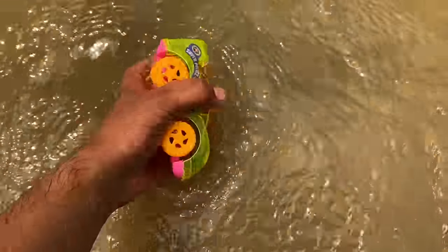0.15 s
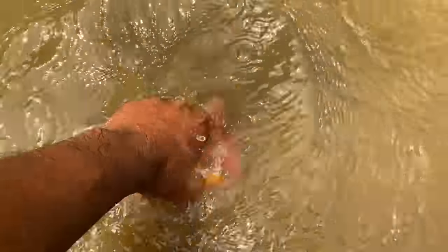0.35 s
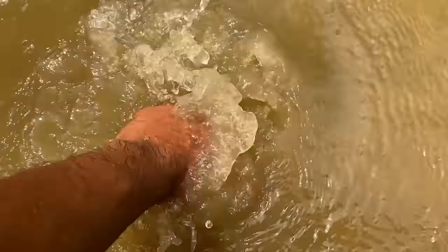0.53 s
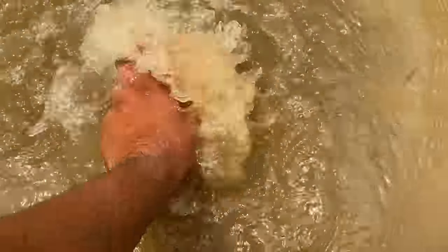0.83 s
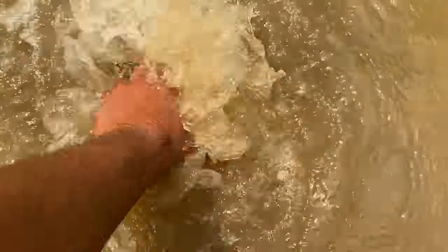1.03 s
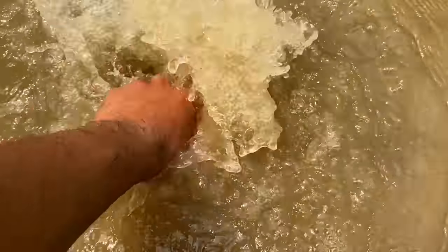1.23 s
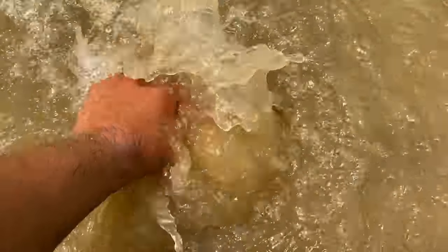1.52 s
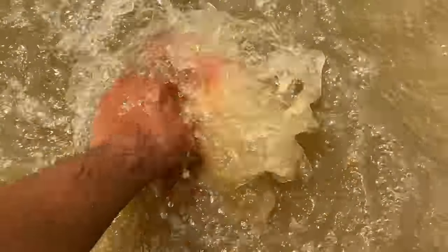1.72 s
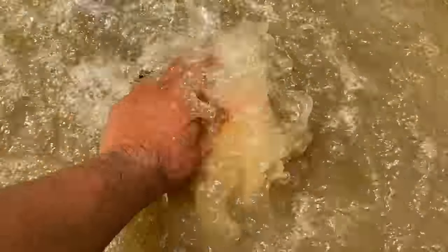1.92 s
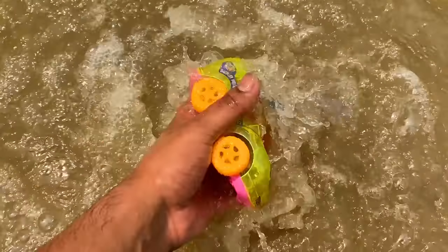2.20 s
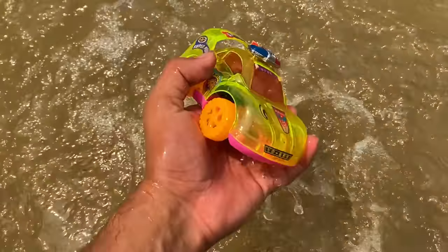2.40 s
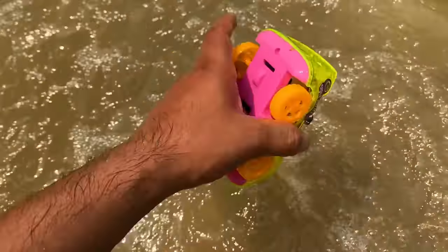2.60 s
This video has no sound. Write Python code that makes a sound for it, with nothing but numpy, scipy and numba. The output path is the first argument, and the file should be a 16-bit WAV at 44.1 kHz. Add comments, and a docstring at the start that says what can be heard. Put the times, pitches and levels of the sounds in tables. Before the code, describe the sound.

Vigorous bubbly water splashes, gurgling and slapping, as a toy is swished under shallow water

```python
"""Bubbles ring and glide as a hand swishes a hollow plastic toy back and forth under shallow water, outdoors.
Each stroke traps air: bubbles and air pockets, small to large, are fading sine waves, most rising in pitch.
Water slaps the toy in short noise bursts, spray crackles in tiny ringing drops and hisses as shaped noise.
A low rumble of lumpy noise swells underneath. A close microphone with two ports hears it all."""
import sys
import numpy as np
from scipy import signal
from scipy.fft import rfft, irfft
from scipy.io import wavfile
from numba import njit

SR = 44100
rng = np.random.default_rng(int(sys.argv[2]) if len(sys.argv) > 2 else 0)


def voltage_ratio(level):
    """Linear amplitude factor for a level in decibels (scalar or array-like)."""
    return 10 ** (np.asarray(level, float) / 20)


def transcribe(u):
    """Save the signal u as a 16-bit wav file named by the first command-line argument.

    u: samples, shape (n,) or (channels, n), limited to [-1, 1]; the rate is SR.
    q: integer samples, one column per channel.
    """
    v = np.clip(np.atleast_2d(u).T, -1, 1)
    q = np.round(v * 32767).astype(np.int16)
    wavfile.write(sys.argv[1], SR, q)


N = 121275  # samples, 2.75 s


def in_time(rows):
    """Draws straight lines between the rows of a table, giving one curve per column after the time."""
    time_s, *columns = np.transpose(rows)
    return [np.interp(np.arange(N) / SR, time_s, column) for column in columns]


def at_hz(points, hz):
    """Reads a table of pitch and level, with straight lines on a logarithmic pitch axis."""
    point_hz, point_db = np.transpose(points)
    return np.interp(np.log(hz + 1), np.log(point_hz), point_db)


def unit(x):
    """Scales a signal to an average (rms) strength of 1."""
    return x / np.sqrt(np.mean(x ** 2) + 1e-20)


def colour(x, tone):
    """Makes each pitch of a sound stronger or weaker, as a tone table says."""
    gain = voltage_ratio(at_hz(tone, np.fft.rfftfreq(N, 1 / SR)))
    return irfft(rfft(x) * gain, N)


def drift(rate_hz):
    """Smooths noise with two equal low-pass stages into a random wander of rms 1."""
    pole = np.exp(-2 * np.pi * rate_hz / SR)
    noise = rng.standard_normal(N + SR)
    smooth = signal.lfilter([1], [1, -2 * pole, pole * pole], noise)
    return unit(smooth[SR:])  # the first second lets the filter settle


@njit
def add_rings(out, start, height, hz, cycles, rise, onset_cycles, sr):
    """Adds sine waves that swell, fade by 40 dB over their cycles and glide to hz * (1 + 2 * rise)."""
    for k in range(len(start)):
        span = cycles[k] / hz[k] * sr  # samples
        for i in range(min(int(span), len(out) - start[k])):
            turns = i * hz[k] / sr
            swell = 1 - np.exp(-turns / onset_cycles)
            fade = np.exp(-4.6 * i / span)
            wave = np.sin(2 * np.pi * turns * (1 + rise[k] * i / span))
            out[start[k] + i] += height[k] * swell * fade * wave


def bubbles(level_db, sizes, rule, clumps):
    """Random bubbles come in clumps and more often in busy water; each rings and rises in pitch."""
    per_s, cycles, rise, spread_db, clump_db, lift_db = rule
    draw = rng.random((30000, 6))  # candidates, of which only some are born
    busy_db = 0.6 * (level_db - level_db.mean())
    start = (draw[:, 0] * N).astype(np.int64)
    crowding = voltage_ratio(clump_db * clumps + busy_db)
    born = draw[:, 1] < per_s * N / SR / len(draw) * crowding[start]
    lowest_hz, highest_hz = sizes[0][0], sizes[-1][0]
    hz = lowest_hz * (highest_hz / lowest_hz) ** draw[:, 2]
    height = voltage_ratio(at_hz(sizes, hz) - spread_db * np.log(draw[:, 3] + 0.09))
    ring_cycles = cycles * (0.68 + 2.35 * draw[:, 4])
    ring_rise = rise * 2 * draw[:, 5]
    out = np.zeros(N)
    add_rings(out, start[born], height[born], hz[born], ring_cycles[born], ring_rise[born], 0.57, SR)
    # Undo the loudness gained from sheer numbers, then follow the level curve.
    even = unit(out * voltage_ratio(-busy_db / 2))
    return voltage_ratio(level_db + lift_db) * even


def churn(level_db, clumps):
    """Middle-sized bubbles ring in the churned water."""
    # how loud bubbles of each size are: pitch_hz, level_db (before random spread)
    churn_sizes = [(400, -19.5), (550, -7), (700, -1.5), (1000, 0), (1400, -3.5)]
    # bubble habits: base_rate_per_s, base_fade_cycles, base_rise_share, spread_db, clumping_db, lift_db
    churn_rule = (416.5, 14.8, 0.066, 1.93, 2, 2.87)
    return bubbles(level_db, churn_sizes, churn_rule, clumps)


def big_bubbles(level_db, clumps):
    """Bigger bubbles ring lower and for fewer cycles."""
    # how loud bubbles of each size are: pitch_hz, level_db (before random spread)
    big_sizes = [(140, -5), (250, -9.5), (430, 4)]
    # bubble habits: base_rate_per_s, base_fade_cycles, base_rise_share, spread_db, clumping_db, lift_db
    big_rule = (140.5, 4.99, 0.321, 5.9, 0.68, 0.91)
    return bubbles(level_db, big_sizes, big_rule, clumps)


def fizz(level_db, clumps):
    """Crowds of small bubbles ring high and blend into a fizz."""
    # how loud bubbles of each size are: pitch_hz, level_db (before random spread)
    fizz_sizes = [(1300, -7.5), (1700, 1.5), (2500, -2), (3500, -2.5), (5500, -4)]
    # bubble habits: base_rate_per_s, base_fade_cycles, base_rise_share, spread_db, clumping_db, lift_db
    fizz_rule = (2000, 17, 0.15, 2, 4, 7)
    return bubbles(level_db, fizz_sizes, fizz_rule, clumps)


def single_bubbles():
    """Single bubbles and pockets, small to large, swell softly and each ring one note; gulps glide more."""
    # steady bubbles and pockets: start_s, level_db (before a shared lift), pitch_hz, fade_cycles (60 at most)
    glugs = [(0.069, -31.5, 2210, 37), (0.181, -32.5, 663, 20), (0.242, -21, 956, 29),
             (0.27, -21.5, 783, 21), (0.281, -8.5, 800, 16), (0.309, -19, 716, 9.9), (0.379, -11, 930, 8),
             (0.515, -20.5, 700, 12), (0.735, -25, 636, 19), (0.764, -20, 475, 8.4),
             (0.807, -16.5, 2070, 30), (0.954, -23, 797, 53), (1.121, -7, 660, 8.5),
             (1.185, -12.5, 623, 11), (1.286, -15.5, 2580, 73), (1.292, -15, 693, 17),
             (1.3735, -13.5, 4380, 55), (1.388, -8, 575, 8.4), (1.503, -8, 1016, 24), (1.598, -18, 668, 17),
             (1.635, -12, 700, 5.8), (1.655, -18, 2700, 38), (1.711, -8.5, 314, 3.9),
             (1.782, -8, 680, 15.4), (1.806, -12, 776, 27), (1.829, -16, 910, 11), (1.853, -11, 646, 17.4),
             (1.875, -5, 1230, 24), (1.939, -18.5, 937, 30), (1.987, -15, 787, 14), (2.076, -18.5, 607, 28),
             (2.123, -20, 610, 22), (2.254, -24, 860, 36), (2.293, -27, 3150, 33), (2.308, -18, 790, 8.6),
             (2.377, -12.5, 1030, 18), (2.41, -23.5, 3550, 99), (2.424, -22.5, 1070, 39),
             (2.475, -25, 1720, 36), (2.5, -18, 1613, 32), (2.622, -19.5, 870, 10.7),
             (2.652, -28, 2100, 34), (2.666, -24, 1710, 50), (2.723, -29.5, 913, 39)]
    # drips, gulps and gliding gurgles: start_s, level_db (before the lift), pitch_hz, fade_cycles, rise_share
    gulps = [(0.048, -37, 1250, 21, 0.022), (0.071, -28, 1260, 19, .05), (0.093, -27, 1290, 13, 0.013),
             (.318, -21, 711, 39.6, -0.46), (0.353, -31, 508, 22, -0.29), (.478, -19.5, 685, 24, 0.5),
             (0.404, -29.5, 311, 20, 0.18), (.49, -8, 190, 1.7, 0.19), (0.899, -16, 65, 5.3, -0.019),
             (1.134, -15.5, 493, 15.4, -0.42), (1.39, -19, 183, 10.5, -0.014), (1.487, -6.5, 126, 3, -0.43),
             (1.52, -4, 77, 5.5, -0.2), (1.524, -15.5, 216, 14.7, -0.22), (1.551, -8, 67, 2.4, -0.25),
             (1.577, -34, 395, 33, 0.42), (2.406, -29.5, 734, 55, 0.36)]
    glug_rise = 0.009  # share
    rows = [row + (glug_rise,) for row in glugs] + gulps
    start_s, level_db, hz, cycles, rise = np.transpose(rows)
    start = (start_s * SR).astype(np.int64)
    out = np.zeros(N)
    add_rings(out, start, voltage_ratio(level_db + 7), hz, np.clip(cycles, 1, 60), rise, 1.6, SR)
    return out


def slaps():
    """Water slaps the toy: noise bursts with a body and a treble part that dies sooner."""
    # slaps of spray: start_s, level_db (before a shared lift), length_s (time to fall to 37 %), treble_lift_db
    slap_rows = [(0.102, -42.5, 0.0023, 13.5), (0.1853, -32, 0.0032, -6), (0.239, -20, 0.0093, -10),
                 (0.256, -15.5, 0.0015, -12), (0.282, -27, 0.001, 18.5), (0.313, -27.5, 0.0033, 9.5),
                 (0.382, -31, 0.0017, 9), (0.411, -28, 0.0034, 2), (0.445, -34, 0.0021, 12),
                 (0.539, -23, 0.0036, -16), (0.768, -23, 0.002, 5.5), (0.788, -16, 0.0027, -10.5),
                 (0.808, -18.5, 0.0032, 2), (0.96, -20, 0.0033, -14), (1.081, -16, 0.0043, 2.5),
                 (1.278, -20, 0.0016, -12), (1.3745, -12, 0.0024, 0), (1.462, -20.5, 0.0051, -4),
                 (1.554, -16.5, 0.0064, -1), (1.635, -40, 0.0016, 5), (1.6475, -17.5, 0.0012, 8),
                 (1.6945, -5, 0.0015, -2), (1.834, -21, 0.0024, 4), (2.143, -23, 0.0025, -20),
                 (2.271, -34.5, 0.0033, 15.5), (2.375, -23.5, 0.0039, -5), (2.228, -36, 0.002, 5),
                 (2.462, -31, 0.004, 14.5)]
    # tone of the body: pitch_hz, level_db
    body_tone = [(1000, -24), (2400, 6), (4400, 2.5), (6000, -0.5), (9000, -13)]
    # tone of the treble part: pitch_hz, level_db
    treble_tone = [(3000, -32), (6000, 13), (11000, 15), (16000, 9.5)]
    attack_s, treble_fade_s = 0.00058, 0.0021
    age_s = np.arange(4000) / SR
    body, treble = np.zeros(N + 4000), np.zeros(N + 4000)
    for start_s, level_db, length_s, lift_db in slap_rows:
        first = int(start_s * SR)
        attack = (1 - np.exp(-age_s / attack_s)) ** 2
        shape = voltage_ratio(level_db + 3) * attack * np.exp(-age_s / length_s)
        body[first:first + len(age_s)] += shape
        treble[first:first + len(age_s)] += shape * voltage_ratio(lift_db) * np.exp(-age_s / treble_fade_s)
    body_noise = unit(colour(rng.standard_normal(N), body_tone))
    treble_noise = unit(colour(rng.standard_normal(N), treble_tone))
    return body[:N] * body_noise + treble[:N] * treble_noise


def droplets(level_db, clumps):
    """Tiny drops of spray ring very high and briefly, which makes a crackle."""
    # how loud drops of each size are: pitch_hz, level_db (before random spread)
    drop_sizes = [(4000, -4.5), (7000, -2.5), (11000, -8.5), (15500, 1.5)]
    # drop habits: base_rate_per_s, base_fade_cycles, base_rise_share, spread_db, clumping_db, lift_db
    drop_rule = (1400, 4.33, 0.93, 7.8, 6, 1.34)
    return bubbles(level_db, drop_sizes, drop_rule, clumps)


def spray_hiss(level_db, clumps):
    """The hiss of the spray is shaped noise that flickers with the spatter."""
    # tone of the hiss: pitch_hz, level_db (per Hz)
    hiss_tone = [(200, -31), (600, 0), (1200, 5.5), (2500, -10.5), (4400, -0.5), (7000, -8.5), (11000, -14),
                 (16000, -13)]
    lift_db, flicker_db = 3, 2.2
    hiss = unit(colour(rng.standard_normal(N), hiss_tone))
    return voltage_ratio(level_db + lift_db + flicker_db * clumps) * hiss


def rumble(level_db):
    """Low noise swells in lumps; both ports share most of it and each has some of its own."""
    # tone of the rumble: pitch_hz, level_db (per Hz)
    rumble_tone = [(20, -25), (35, -3), (58, 8), (85, 6.5), (125, 0.5), (200, -24.5), (350, -37)]
    lumps_db, own_db, pan_db = 3.5, -4, 0.4
    shared, left, right = (unit(colour(rng.standard_normal(N), rumble_tone)) for _ in range(3))
    both = shared + voltage_ratio(own_db) * np.array([left, right])
    balance = voltage_ratio(np.array([[pan_db], [-pan_db]]))
    return voltage_ratio(level_db + lumps_db * drift(13.5)) * both * balance


def ports(water):
    """The left port hears the water as is; the right one coloured, phase-turned and partly scrambled."""
    # tone at the right port: pitch_hz, level_db
    right_tone = [(300, 2), (430, 0), (560, -13.5), (700, -4.5), (800, -5.5), (1200, -7), (1600, -0.2),
                  (2500, -2.5), (3300, -5), (4700, -16), (5800, -6)]
    # its treble end: pitch_hz, level_db
    right_treble = [(6500, 0), (16000, 0)]
    # phase turn at the right port: pitch_hz, turn_radians
    right_phase = [(170, 0), (470, -1.25), (640, -.55), (1030, -2.0), (1300, -2.2), (1640, -3.1),
                   (2500, -6.45), (3300, -7.5), (3800, -12.3), (4300, -12.2), (5950, -19.1), (6400, -19.6),
                   (17000, -4.19)]
    # tone of the scrambled share, in the right port alone: pitch_hz, level_db
    scatter_tone = [(100, -7), (500, -20), (1500, -7), (3000, -9), (5000, -3)]
    # its treble end: pitch_hz, level_db
    scatter_treble = [(6500, -40), (16000, -40)]
    hz = np.fft.rfftfreq(N, 1 / SR)
    phase = np.interp(hz, *np.transpose(right_phase))
    turn = np.exp(1j * phase) * voltage_ratio(at_hz(right_tone + right_treble, hz))
    direct = irfft(rfft(water) * turn, N)
    # Multiplying by a fast random wander scrambles the water sound.
    scattered = colour(water * drift(380), scatter_tone + scatter_treble)
    return np.array([water, direct + scattered])


def scene():
    """Adds up all the water sounds, passes them through the two ports and adds the rumble."""
    # strokes as level curves, before later lifts: time_s, churn_level_db, fizz_level_db, spray_level_db
    strokes = [(0.03, -48, -49.5, -53), (0.23, -55, -52, -56.5), (0.24, -35.5, -35.5, -47.5),
               (0.46, -34, -49, -64.5), (0.54, -31.5, -35, -41), (0.71, -38, -46.5, -45.5),
               (0.74, -28, -32, -40.5), (0.91, -36, -39, -38.5), (0.94, -20, -27.5, -44),
               (1.01, -32, -41.5, -38.5), (1.12, -26.5, -35.5, -41), (1.26, -32.5, -42.5, -42),
               (1.29, -25, -25.5, -33), (1.345, -27.5, -37, -39), (1.37, -32, -39.5, -40),
               (1.39, -27.5, -33, -36.5), (1.75, -30.5, -35.5, -38), (1.86, -24, -31.5, -38),
               (1.92, -34, -37.5, -38), (2.07, -24.5, -33, -37), (2.45, -40.5, -48.5, -46.5),
               (2.54, -46.5, -50, -49.5), (2.75, -43.5, -43.5, -43.5)]
    # low end as level curves, before later lifts: time_s, rumble_level_db, big_bubble_level_db
    low_end = [(0.0, -45, -48), (0.26, -38, -59), (0.41, -28, -32.5), (0.7, -44, -42.5), (0.73, -29, -42),
               (0.86, -33, -35), (0.9, -30.5, -44), (0.98, -44, -38.5), (1.09, -26, -37), (1.3, -49, -36),
               (1.55, -26.5, -25.5), (1.61, -33.5, -35), (1.74, -23.5, -32), (1.88, -23, -23.5),
               (1.91, -39, -34), (2.04, -26, -28.5), (2.3, -42.5, -50.5), (2.43, -33.5, -58),
               (2.75, -42.5, -45)]
    churn_db, fizz_db, spray_db = in_time(strokes)
    rumble_db, big_db = in_time(low_end)
    surge = drift(20)  # clumps shared by churn and big bubbles
    spatter = drift(30)  # clumps shared by fizz, droplets and hiss
    ringing = churn(churn_db, surge) + big_bubbles(big_db, surge) + fizz(fizz_db, spatter)
    spray = droplets(spray_db, spatter) + spray_hiss(spray_db, spatter)
    water = ringing + single_bubbles() + slaps() + spray
    return ports(water) + rumble(rumble_db)


def top_cut(x):
    """Nothing passes above the cut-off."""
    return signal.sosfilt(signal.butter(12, 16990, fs=SR, output="sos"), x)


def record(dry):
    """Rounds off the peaks and cuts the top of the treble with a steep low-pass filter."""
    rounded = 1.2 * np.tanh(dry / 1.2)
    # order 8, 0.5 dB ripple, 30 dB cut, edge at 15750 Hz
    low_pass = signal.ellip(8, 0.5, 30, 15750, fs=SR, output="sos")
    mix = signal.sosfilt(low_pass, rounded)
    return top_cut(mix)


dry = scene()
out = record(dry)
transcribe(out)
```